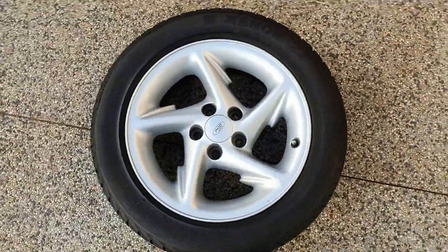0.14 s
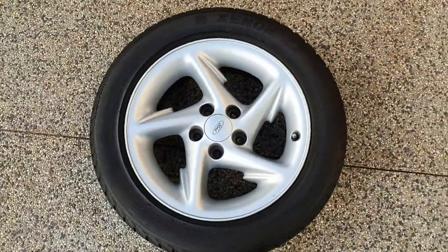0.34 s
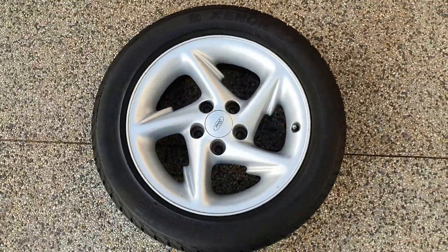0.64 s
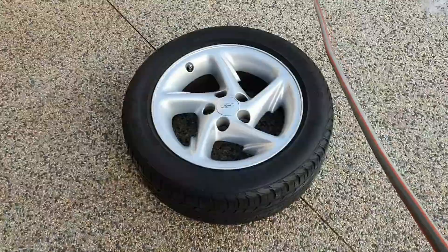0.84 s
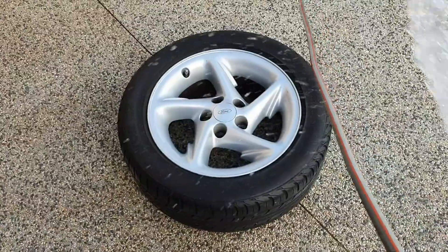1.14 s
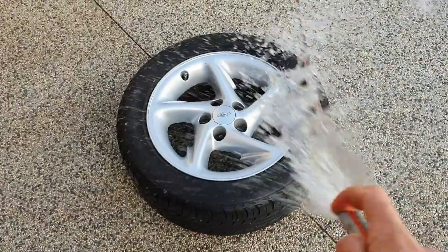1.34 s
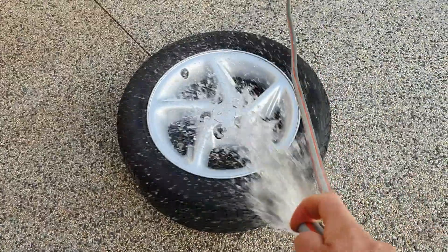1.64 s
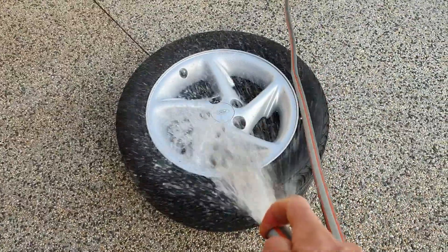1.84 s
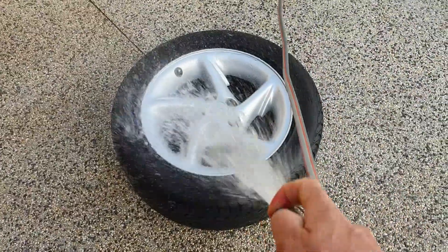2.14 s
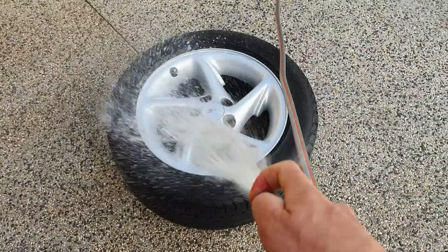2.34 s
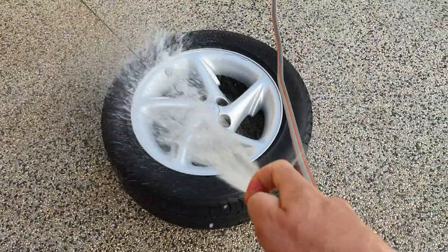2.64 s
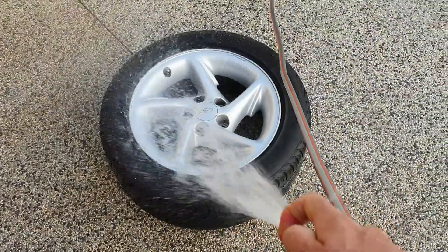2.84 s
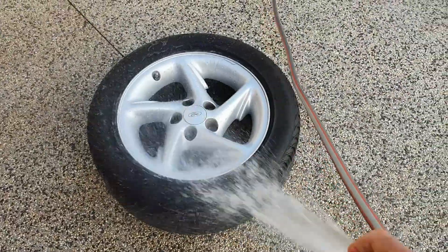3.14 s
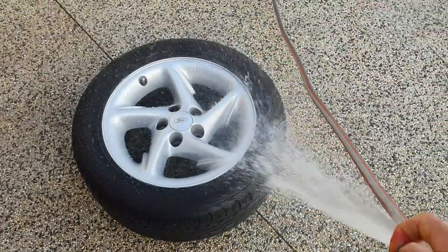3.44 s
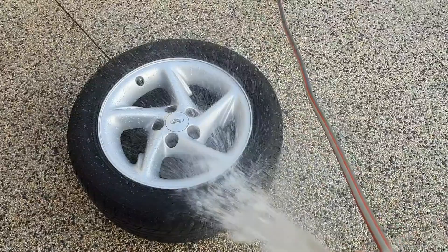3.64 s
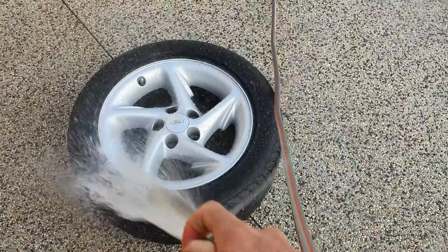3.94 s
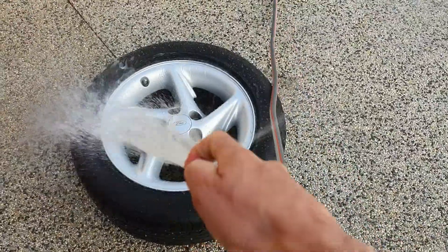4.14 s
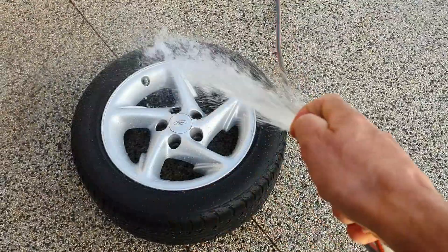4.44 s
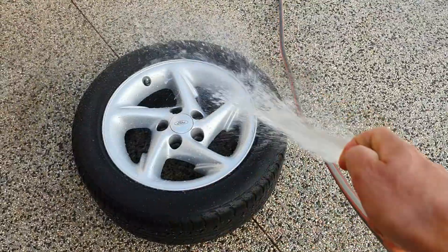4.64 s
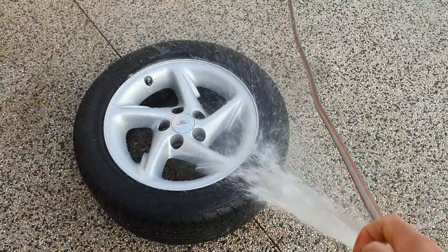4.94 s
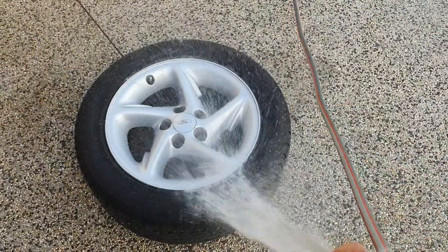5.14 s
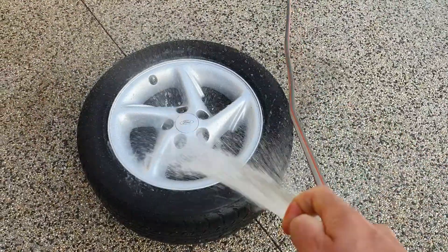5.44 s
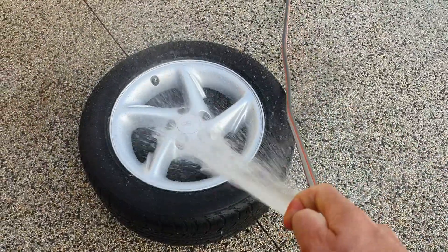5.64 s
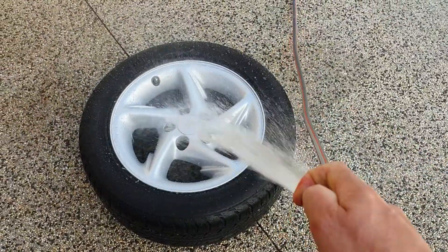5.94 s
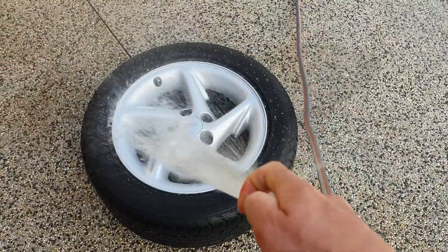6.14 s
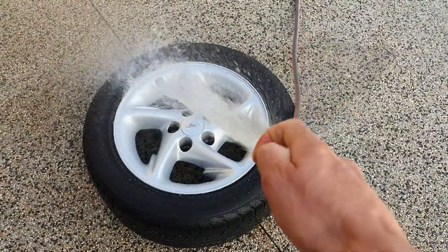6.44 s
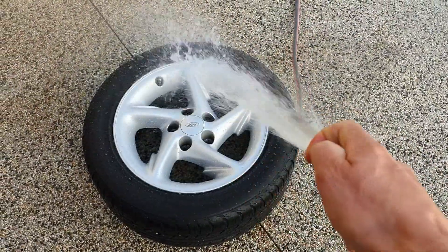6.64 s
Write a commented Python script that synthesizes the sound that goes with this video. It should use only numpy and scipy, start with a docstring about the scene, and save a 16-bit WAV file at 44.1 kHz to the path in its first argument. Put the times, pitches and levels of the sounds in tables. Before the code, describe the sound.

It opens quietly outdoors with faint air and soft wind bumps on a close microphone, a light scuff at about 0.3 seconds and a tiny falling chirp at 0.6. The sound drops out for an instant at 0.8 seconds, then a hose starts, spitting and sputtering, with separate drops ticking on stone. It settles into a thin, high nozzle hiss and a spatter of water on a tyre, a metal wheel and the ground. Low wind thumps and flutter buffet the microphone irregularly, loudest around 2 seconds, where they dominate the water, and return in smaller gusts. The spray grows louder at about 4.5 seconds. From 5.4 to 6.1 seconds the wind eases and the stream strikes the hub, making the wheel ring with a bright metallic note and several pings. Hiss and spatter continue with fresh gusts until the end, near 6.8 seconds.

```python
"""A hose sprays an alloy wheel on a pebbled floor outdoors, close to a phone. First come faint air, a scuff
and a chirp, while turbulent wind buffets each microphone port in its own way. After a short drop-out at
0.8 s the jet starts, spitting air: it hisses at the nozzle, spatters on floor and tyre, and its impacts
excite the wheel's normal modes. The gusts are strongest near 2 s. From about 5.4 to 6.1 s the stream
strikes the hub and the wheel rings loudest."""
import sys
import numpy as np
from scipy import signal
from scipy.fft import rfft, irfft, next_fast_len
from scipy.io import wavfile
from scipy.ndimage import uniform_filter1d, map_coordinates

SR = 44100
rng = np.random.default_rng(int(sys.argv[2]) if len(sys.argv) > 2 else 0)


def bounce(signal):
    """Save signal as a 16-bit WAV file at the path given by the first command-line argument."""
    frames = np.transpose(np.atleast_2d(signal))
    limited = np.clip(frames, -1, 1)
    pcm = np.round(limited * 32767).astype(np.int16)
    wavfile.write(sys.argv[1], SR, pcm)


N = 299216
TIME_S = np.arange(N) / SR


def amp(db):
    """Amplitude ratio of a level."""
    return 10 ** (np.asarray(db) / 20)

def unit(x):
    """Normalisation to rms 1."""
    return x / np.sqrt(np.mean(x ** 2) + 1e-20)

def along(points, hz):
    """Interpolation on a logarithmic frequency axis."""
    f, v = np.transpose(points)
    return np.interp(np.log(hz + 1), np.log(f + 1), v)

def curves(rows):
    """Linear interpolation in time, one curve per value column."""
    s, *cols = np.transpose(rows)
    return [np.interp(TIME_S, s, c) for c in cols]

def wobble(rate_hz, channels=1):
    """Smooth random modulation: a spline through Gaussian knots."""
    at = [np.arange(N) * rate_hz / SR]
    knots = rng.standard_normal((channels, int(N * rate_hz / SR) + 4))
    return np.array([map_coordinates(row, at) for row in knots])

def span(start_s, t):
    """Index of the samples an event occupies."""
    return np.s_[:, round(start_s * SR):round(start_s * SR) + len(t)]

def filtered(x, response):
    """Linear filtering: the spectrum times a frequency response."""
    m = next_fast_len(N + 8192)
    return irfft(rfft(x, m) * response(np.fft.rfftfreq(m, 1 / SR)), m)[..., :N]

def coloured(x, spectrum):
    """Spectral shaping, at rms 1."""
    return unit(filtered(x, lambda hz: amp(along(spectrum, hz))))

def resonance(hz, pitch_hz, width_hz):
    """Response of a damped oscillator."""
    return 1j * hz * width_hz / (pitch_hz ** 2 - hz ** 2 + 1j * hz * width_hz)

def patter(rate_hz, spread_db, share, patchy_db):
    """Shot noise mixed with Gaussian noise, patchy in time and frequency; two independent streams."""
    size_db = spread_db * np.minimum(rng.exponential(size=(2, N)), 2.5)
    impacts = (rng.random((2, N)) < rate_hz / SR) * rng.standard_normal((2, N)) * amp(size_db)
    mix = np.sqrt(share) * unit(impacts) + np.sqrt(1 - share) * rng.standard_normal((2, N))
    z = signal.stft(mix, nperseg=256)[2]
    patches = uniform_filter1d(rng.standard_normal(z.shape[1:]), size=5, axis=0)
    patches = uniform_filter1d(patches, size=14, axis=1)
    return signal.istft(z * amp(patchy_db * unit(patches)), nperseg=256)[1][:, :N]

# Likeness of the two ports: frequency_hz, coherence
PORT_COHERENCE = [(300, 0.55), (700, 0.78), (2800, 0.82), (4200, 0.52), (7000, 0.45), (14000, 0.35)]
# Their level difference: frequency_hz, left_minus_right_db
PORT_BALANCE = [(60, 7), (180, -3), (550, -0.5), (1650, -1), (2530, 1.5), (3500, 0.5), (4970, -3),
                (9500, -8), (15000, -1.5)]
def ports(pair):
    """Partial coherence: two streams reach the ports as sum and difference, offset in level and time."""
    lag_s = .000104  # sound from below reaches the right port first
    half = np.array([[.5], [-.5]])
    angle = lambda hz: np.arccos(along(PORT_COHERENCE, hz)) / 2
    mid, side = filtered(pair, lambda hz: np.array([np.cos(angle(hz)), np.sin(angle(hz))]))
    offset = lambda hz: amp(half * along(PORT_BALANCE, hz)) * np.exp(-2j * np.pi * half * hz * lag_s)
    return filtered(np.array([mid + side, mid - side]), offset)


# Distant air: frequency_hz, density_db
AIR_SPECTRUM = [(120, -57), (200, -18.5), (636, -10.5), (721, -14.5), (849, -8.5), (929, -17.5),
                (1490, -14), (8120, -24), (15000, -31)]
def air():
    """Ambient noise under slow amplitude modulation."""
    level_db = -56 + 1.1 * wobble(4.5)
    return amp(level_db) * coloured(patter(200, spread_db=3.5, share=.05, patchy_db=1.2), AIR_SPECTRUM)

# A nearby scuff: frequency_hz, density_db
SCUFF_SPECTRUM = [(240, -35), (400, -2), (1550, -5.5), (3480, -18), (4570, -22), (9000, -35), (11700, -56),
                  (19800, -120)]
def scuff(peak_s=.347, rise_db_per_s=800, fall_db_per_s=554):
    """A noise transient with exponential growth and decay."""
    level_db = -36 - np.maximum(rise_db_per_s * (peak_s - TIME_S), fall_db_per_s * (TIME_S - peak_s))
    return amp(level_db) * coloured(patter(700, spread_db=4, share=.3, patchy_db=0), SCUFF_SPECTRUM)

def chirp(start_s=.606, length_s=.055, from_hz=3800, to_hz=2150):
    """A faint falling sweep with random amplitude and phase modulation."""
    done = np.clip((TIME_S - start_s) / length_s, 0, 1)
    hz = from_hz * (to_hz / from_hz) ** done
    envelope = amp(-55 - 3.5 * done + 7.2 * wobble(83)) * np.abs(np.sin(np.pi * done)) ** .13
    return envelope * np.sin(2 * np.pi * np.cumsum(hz) / SR + wobble(480)) * [[1], [0]]

# Gusts: start_s, thump_db, turbulence_db, flutter_above_db, left_minus_right_db, t60_s
PORT_GUSTS = [(0.131, -22, -48, -13, -14, 0.19), (0.517, -21.5, -44, -27, -10, 0.34),
              (0.845, -10, -21, -18.5, 1.5, 0.32), (1.187, -28, -26.5, -22, -1, 0.099),
              (1.279, -10, -23, -19, -4, 0.12), (1.323, -8.5, -24.5, -26, -2, 0.25),
              (1.445, -23, -21.5, -13.5, 7.5, 0.2), (1.688, -9, -31.5, -11, 6, 0.86),
              (1.753, -3, -23, -8, 2.5, 0.27), (1.797, -11, -15, -20, 1, 0.15),
              (1.871, -11, -14.5, -9.5, -2, 0.12), (2.008, -26, -17.5, -1.5, 5, 0.24),
              (2.056, 4, -14.5, -2, 5, 0.16), (2.088, 3.5, -9.5, -22, 3, 0.21),
              (2.188, -14, -13.5, -8, -1, 0.16), (2.428, -20, -22.5, -10, 10, 0.12),
              (2.468, -12.5, -15, -31, 2, 0.091), (2.575, -29, -36, 5.5, 1, 0.37),
              (2.619, -28, -26, 0.5, 3, 0.27), (2.668, -7, -17.5, -16, 3, 0.31),
              (2.856, -9.5, -26, -15, 5, 0.18), (2.946, -16, -18, -25, -11.5, 0.11),
              (2.984, -12, -33, -17, -12, 0.091), (3.058, -27, -37, -30, -22, 0.41),
              (3.207, -25, -26, -24, -7, 0.41), (3.256, -29, -31, -25, -8, 0.27),
              (3.376, -13, -33.5, -19, 11, 0.65), (3.8, -14, -33.5, -31, -4, 0.5),
              (4.03, -13, -33, -10.5, 2, 0.27), (4.091, -14, -17, -13.5, -1, 0.31),
              (4.362, -32, -28.5, 8.5, 0, 0.063), (4.461, -11, -32, -35, 2, 0.58),
              (5.412, -27, -28, -19, 2, 0.58), (5.577, -15, -27, -23, 7, 0.3),
              (5.786, -19.5, -33, -25, 4.5, 0.58), (6.019, -23, -34, -14, 5, 0.53),
              (6.092, -29, -32, -31, 6, 0.29), (6.176, -27, -22.5, -6, 0, 0.13),
              (6.263, -6.5, -18, -8.5, 0, 0.13), (6.401, -18, -41, -4, -4, 0.51),
              (6.724, -17, -20, 2.5, 3.5, 0.12)]
# Gusts that push one port and pull the other: start_s
ANTIPHASE_GUSTS = [1.278, 1.689, 1.754, 2.188, 2.668, 2.946, 2.984, 3.801, 6.019, 6.724]
def gusts(rise_s=.0065, thump_hz=79.7, thump_t60_s=.083):
    """Transient excitation: each gust gives rumble and flutter envelopes and thumps the membrane."""
    low, bright, thumps = np.zeros((3, 2, N + SR))
    t = np.arange(SR // 2) / SR
    for s, thump_db, db, above_db, lean_db, t60_s in PORT_GUSTS:
        lean, at = amp([lean_db / 2, -lean_db / 2]), span(s, t)
        swell = np.outer(lean, amp(db - 60 * t / abs(t60_s)) * (1 - np.exp(-t / rise_s)))
        low[at] += swell
        bright[at] += amp(above_db) * swell
        hz = thump_hz * np.exp(.08 * rng.standard_normal())
        envelope = amp(thump_db - 60 * t / thump_t60_s) * (1 - np.exp(-t / .0077))
        polarity = -1 if np.isclose(s, ANTIPHASE_GUSTS, atol=.005).any() else 1
        thumps[at] += np.outer(lean * [1, polarity], envelope * np.sin(2 * np.pi * hz * t))
    return low[:, :N], bright[:, :N], thumps[:, :N]

# Flaps of air: start_s, level_db, pitch_hz, left_minus_right_db
AIR_FLAPS = [(1.452, -32, 307, -15), (2.01, -19, 344, -20), (2.025, -15, 231, 2), (2.039, -15, 231, -1.5),
             (2.058, -7, 233, 4), (2.092, -16, 284, -2.5), (2.193, -13.5, 231, 10), (2.217, -15, 228, -0.5),
             (2.434, -25, 336, -13), (2.581, -30, 342, -2.0), (2.594, -30, 401, 1.5),
             (2.607, -22.5, 367, 2), (2.623, -25, 304, -2.0), (2.644, -27, 367, -12),
             (2.677, -23.5, 441, -15), (2.746, -29, 420, 0.5), (2.987, -16, 234, 8), (3.255, -24, 275, 0),
             (4.112, -31, 264, 0), (4.376, -22, 376, -15), (6.179, -20.5, 352, 0.0), (6.238, -16, 324, 5),
             (6.27, -19, 285, 5), (6.285, -18.5, 245, -1.5), (6.432, -22.5, 233, 7), (6.727, -23, 300, 0)]
def flaps(t60_cycles=3.13):
    """Heavily damped oscillations of air across a port."""
    out, t = np.zeros((2, N + SR)), np.arange(SR // 2) / SR
    for s, db, hz, lean_db in AIR_FLAPS:
        envelope = amp(db + 7.5 - 60 * t * hz / t60_cycles) * (1 - np.exp(-4 * t * hz))
        out[span(s, t)] += np.outer(amp([lean_db / 2, -lean_db / 2]), envelope * np.sin(2 * np.pi * hz * t))
    return out[:, :N]

# Steady wind, one list before and one after the drop-out: time_s, rumble_db, flutter_above_db
WIND_LEVELS = [
    [(0.0, -53, -7), (0.148, -44, -9.5), (0.42, -49.5, -10), (0.64, -52.5, -4), (0.81, -63, 3)],
    [(0.85, -48, -15), (1.03, -36, -26), (1.69, -36.5, -22), (1.94, -24, -17), (3.3, -33, -10.5),
     (4.4, -33.5, -17), (5.04, -35.5, -20), (5.19, -36.5, -12.5), (5.61, -45, -24), (5.87, -54, -13),
     (6.04, -31.5, -16.5), (6.3, -30, -12), (6.78, -34, -10)],
]
# The two bands of turbulence: frequency_hz, density_db
RUMBLE_SPECTRUM = [(12, -36), (25, -9), (70, 0), (108, -3.5), (206, -12), (253, -17), (300, -19.5),
                   (390, -50), (660, -120)]
FLUTTER_SPECTRUM = [(88, -20), (150, -13), (258, -3.5), (382, -2.5), (1060, -30), (1800, -44), (2340, -67),
                    (3960, -120)]
# Lulls: centre_s, depth_db, half_length_s
WIND_LULLS = [(0.888, 12, 0.012), (2.119, 6, 0.011), (2.527, 12, 0.021), (2.829, 5, 0.012),
              (2.902, 12, 0.01), (3.021, 9, 0.021), (3.126, 8.5, 0.021), (4.176, 13, 0.0094), (5.3, 7, .03),
              (6.167, 10, 0.011), (6.336, 5, 0.017)]
def wind(shared_power=.28):
    """Turbulent pressure fluctuations, partly common to both ports, swell and brighten in gusts."""
    rumble_db, flutter_db = curves(np.concatenate(WIND_LEVELS))
    lumps = wobble(26, channels=2)
    eddies = rng.standard_normal((2, 2, N)) + shared_power ** .5 * rng.standard_normal((2, 1, N))
    rumble = unit(amp(4 * lumps) * coloured(eddies[0], RUMBLE_SPECTRUM))
    flutter = unit(amp(3 * lumps + 2.6 * wobble(90, channels=2)) * coloured(eddies[1], FLUTTER_SPECTRUM))
    low, bright, thumps = gusts()
    lull = amp(-sum(db * np.exp(-((TIME_S - s) / half) ** 4) for s, db, half in WIND_LULLS))
    steady = amp(rumble_db + 1.5 * wobble(5, channels=2))
    return lull * ((steady + low) * rumble + (amp(flutter_db) * steady + bright) * flutter + thumps + flaps())


# Single droplets: start_s, level_db
DROPLET_TICKS = [(0.9035, -30), (1.068, -34), (1.5888, -32), (1.682, -31), (1.795, -34), (1.9171, -24),
                 (2.158, -27), (3.4406, -35)]
# Their colour: frequency_hz, density_db
TICK_SPECTRUM = [(1500, -40), (3000, -9), (6000, -6), (8000, -38), (11000, 9), (15000, -1)]
def ticks(t60_s=.004):
    """A brief impact has a broad spectrum: each droplet is a burst of bright noise."""
    out, t = np.zeros((2, N + SR)), np.arange(SR // 50) / SR
    fizz = coloured(rng.standard_normal((2, N)) * [[1], [.3]], TICK_SPECTRUM)
    for s, db in DROPLET_TICKS:
        out[span(s, t)] += amp(db - 60 * t / t60_s) * fizz[span(s, t)]
    return out[:, :N]

# Normal modes: pitch_hz, width_hz, rim_struck_db, hub_struck_db
WHEEL_MODES = [(544, 35, -0.5, -16), (1210, 230, -14.5, -20.5), (1408, 63, 0, -11), (1907, 115, 1.5, -38),
               (2380, 180, -7, -4.5), (2539, 47, 0, 9), (2928, 39, 0, -22), (4038, 130, -1, -3)]
AT_RIM, AT_HUB = 0, 1
def wheel(force, struck):
    """Modal superposition: the point of impact sets the strength of each mode."""
    return filtered(force, lambda hz: sum((-1) ** k * amp(db[struck]) * resonance(hz, pitch, width)
                                          for k, (pitch, width, *db) in enumerate(WHEEL_MODES)))

# Big drops that land alone: start_s, level_db, pitch_hz
BIG_DROPS = [(0.856, -26, 2930), (0.9035, -26, 4800), (1.0445, -27.5, 3600), (1.065, -35, 2820),
             (1.111, -32, 2350), (1.1293, -29, 3770), (1.143, -22, 3770), (1.15, -25, 2610),
             (1.1614, -17, 2650), (1.169, -27, 2620), (1.1935, -28, 3600), (1.253, -27, 3590),
             (1.3069, -25, 3700), (1.4404, -30, 2340), (1.446, -21.5, 3860), (1.5203, -23, 4220),
             (1.5755, -21.5, 2520), (1.6332, -24.5, 2470), (1.7624, -22.5, 3600), (1.7943, -16.5, 4300),
             (1.7979, -16, 2463), (2.0417, -26, 2620), (2.3384, -30, 3430), (2.49, -33, 1960),
             (2.492, -27, 3530), (2.668, -27.5, 3600), (3.2, -33.5, 1930), (4.055, -29, 3020),
             (4.115, -26, 3060), (5.597, -13.5, 2600), (5.606, -18, 4020), (5.7279, -8, 2564),
             (5.7871, -15.5, 2480), (5.8258, -16, 2520), (5.9184, -14.5, 2470), (6.0667, -16.5, 2490),
             (6.0883, -17, 2510), (6.137, -23, 2500)]
def drops(hub_hz=2520, splat_width_hz=490, plop_t60_s=.008, splat_t60_s=.035):
    """Impulse responses: a damped plop, a noisy splat and, near the hub's pitch, the wheel's ring."""
    out, t = np.zeros((2, N + SR)), np.arange(SR // 20) / SR
    ping = wheel(signal.unit_impulse(N), AT_HUB)[:len(t)]
    ping = ping / ping.max() * [[1], [0]]
    noise = rng.standard_normal((2, N)) * [[1], [.4]]
    spray = unit(filtered(noise, lambda hz: 1 / (1 + (hz / splat_width_hz) ** 2)))
    for s, db, hz in BIG_DROPS:
        hub_share = .9 * np.exp(-(np.log(hz / hub_hz) / .035) ** 2)
        plop = 2 * np.sin(2 * np.pi * hz * t) * amp(-60 * t / plop_t60_s) * (1 - np.exp(-t / .0004))
        splat = .67 * spray[span(s, t)] * np.cos(2 * np.pi * hz * t) * amp(-60 * t / splat_t60_s)
        out[span(s, t)] += amp(db) * ((1 - hub_share) * (plop * [[1], [.3]] + splat) + hub_share * ping)
    return out[:, :N]

# Ring of drops on stone: pitch_hz, width_hz
STONE_BANDS = [(2500, 320), (3700, 240), (4800, 240)]
def spit():
    """Sparse impacts of the first water excite broad resonances on the floor."""
    impacts = patter(220, spread_db=4, share=.8, patchy_db=1)
    return unit(filtered(impacts, lambda hz: sum(resonance(hz, *band) for band in STONE_BANDS)))

# Nozzle hiss: frequency_hz, density_db
HISS_SPECTRUM = [(4120, -17), (7000, -77), (8720, -13.5), (10800, 2), (13900, 7.5), (15000, 3.5)]
def nozzle():
    """Jet noise, concentrated in the high treble."""
    return coloured(patter(1000, spread_db=3, share=.42, patchy_db=2), HISS_SPECTRUM)

# Spray on floor and tyre: frequency_hz, density_db
SPATTER_SPECTRUM = [(240, -12), (400, -4.5), (547, -10.5), (945, -11), (1420, -8.5), (1610, -20.5),
                    (1860, -7), (3340, 1), (6000, -4.5), (7600, -18), (9000, -19), (11700, -16),
                    (19800, -120)]
# Its hollow band and low body: time_s, band_hz, lift_db, body_db
SPATTER_COLOUR = [(.85, 2970, 4, -4), (1.05, 4040, -2, -7), (1.17, 2920, 9, -1), (1.5, 4300, 4, -7),
                  (2.25, 3560, 4.5, -7), (2.8, 3520, 7, -11), (3.08, 2770, 7, 8), (3.3, 3600, 3, 2),
                  (3.7, 4100, 3, 6.5), (3.8, 2900, 6.5, 9), (4.12, 2930, 9, 0), (4.2, 3360, 2, 0),
                  (5.18, 3800, 4, 6.5), (5.5, 2940, 4.5, 4), (6.0, 4240, -4, 4), (6.3, 3280, 3, 4.5),
                  (6.78, 3580, 2, -4)]
def spatter(band_width_hz=210, body_below_hz=1700):
    """Impact noise under a time-varying filter: the colour follows what the jet strikes."""
    spray = coloured(patter(500, spread_db=4.5, share=.29, patchy_db=2), SPATTER_SPECTRUM)
    hz, t, z = signal.stft(spray, SR, nperseg=512)
    s, *cols = np.transpose(SPATTER_COLOUR)
    band_hz, lift_db, body_db = (np.interp(t, s, c) for c in cols)
    band = np.exp(-((hz[:, None] - band_hz) / band_width_hz) ** 2)
    body = 1 / (1 + (hz[:, None] / body_below_hz) ** 6)
    return signal.istft(z * amp(lift_db * band + body_db * body), SR, nperseg=512)[1][:, :N]

def rim():
    """Forced vibration of the wheel, drummed at its rim."""
    return unit(wheel(patter(330, spread_db=2.5, share=.27, patchy_db=3), AT_RIM))

# Ring of the hub: time_s, level_db
HUB_LEVELS = [(.85, -58.5), (3.46, -57), (3.97, -51.5), (5.16, -52), (5.33, -50), (5.44, -32), (5.46, -39),
              (5.58, -30), (5.61, -22), (5.65, -33), (5.736, -25), (5.76, -32), (5.834, -24), (5.886, -29),
              (5.926, -25.5), (5.948, -30.5), (5.984, -21), (6.032, -27), (6.134, -46), (6.2, -42.5),
              (6.78, -54)]
# Its glide: time_s, pitch_ratio
HUB_GLIDE = [(5.55, .991), (6.05, 1.007)]
def hub():
    """Forced vibration at the hub; the note climbs as the stream moves."""
    ring = unit(wheel(patter(300, spread_db=0, share=.35, patchy_db=1), AT_HUB))
    position = np.cumsum(curves(HUB_GLIDE)[0])
    gliding = np.array([map_coordinates(stream, [position]) for stream in ring])
    return amp(curves(HUB_LEVELS)[0] + 1.2 * wobble(35)) * gliding

# The stream: time_s, hiss_db, spatter_db, rim_db
JET_LEVELS = [(0.85, -50, -46, -52), (0.9, -46, -39, -83), (1.01, -47, -44.5, -82), (1.13, -47, -39.5, -57),
              (2.02, -40.5, -42.5, -46), (2.07, -43, -46.5, -51), (3.35, -44, -45, -49.5),
              (3.7, -39.5, -39.5, -42.5), (4.19, -41, -42.5, -45), (4.53, -31.5, -32, -40.5),
              (4.65, -33.5, -34, -44), (5.28, -37.5, -34, -36), (5.33, -38, -37.5, -40),
              (5.41, -35.5, -36, -35), (5.81, -34, -34.5, -39), (6.45, -35, -38.5, -40),
              (6.58, -32, -33, -37.5), (6.78, -37.5, -36, -44)]
# Its brief falters: centre_s, depth_db
JET_FALTERS = [(1.035, 7.5), (1.24, 3), (1.605, 3), (2.83, 5.5), (5.32, 3)]
def jet(start_s=.8405, sputter_s=1.24, falter_s=.024):
    """Common modulation: the jet's sounds surge together; air in the hose makes it sputter at first."""
    hiss_db, spatter_db, rim_db = curves(JET_LEVELS)
    sputter = np.exp(np.minimum(start_s - TIME_S, 0) / sputter_s)
    surge_db = .5 * wobble(14) + (.79 + 2 * sputter) * wobble(45)
    falter_db = sum(db * np.exp(-((TIME_S - s) / falter_s) ** 2) for s, db in JET_FALTERS)
    water = amp(hiss_db) * nozzle() + amp(spatter_db) * spatter()
    metal = amp(rim_db) * rim() + hub()
    spitting = amp(-46.5) * sputter * spit()
    return amp(surge_db - falter_db) * (water + metal + spitting) * (TIME_S > start_s)


def scene():
    """Superposition: airborne sound reaches both ports; wind acts on each directly."""
    return ports(jet() + drops() + air() + scuff() + chirp() + ticks()) + wind()

def record(dry, ceiling=.9, top_hz=14600):
    """Soft saturation, a brief drop-out with a sudden return, and a band limit."""
    soft = dry / (1 + np.abs(dry / ceiling) ** 4) ** (1 / 4)
    dropout_db = np.interp(TIME_S, [.801, .803, .8441], [0, -2, -50.4], right=0)
    return filtered(soft * amp(dropout_db), lambda hz: hz < top_hz)


dry = scene()
out = record(dry)
bounce(out)
```